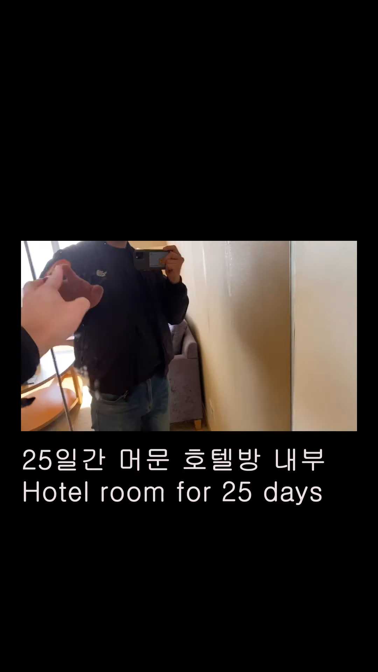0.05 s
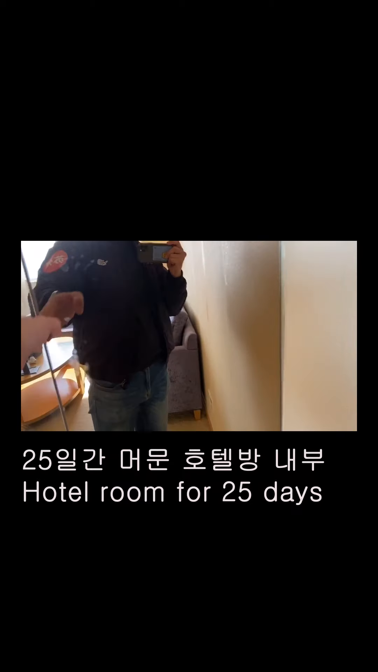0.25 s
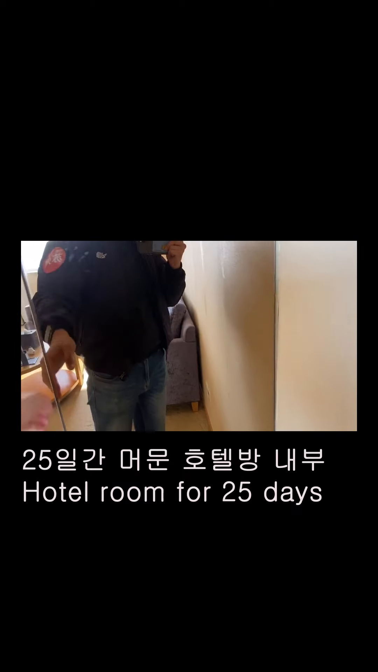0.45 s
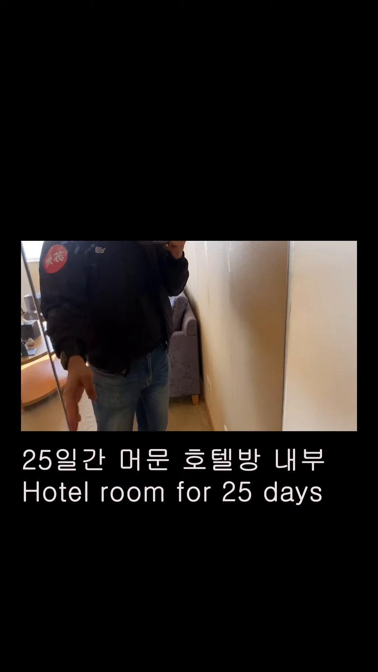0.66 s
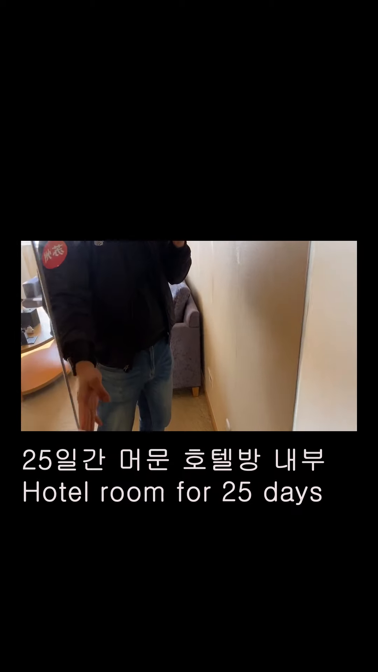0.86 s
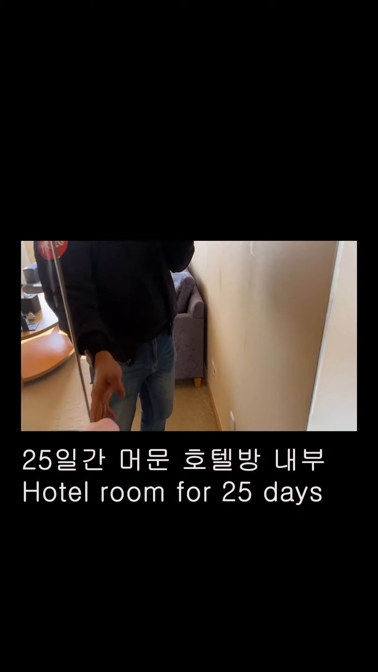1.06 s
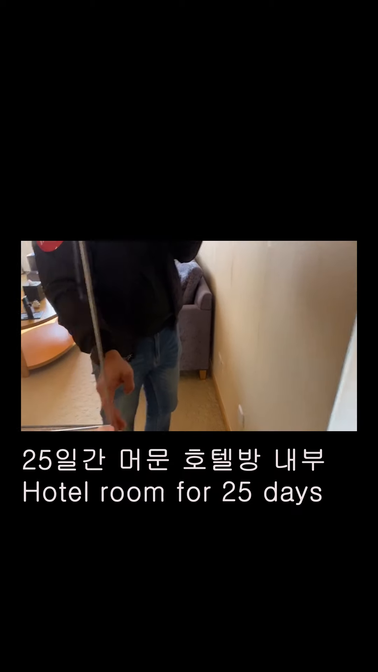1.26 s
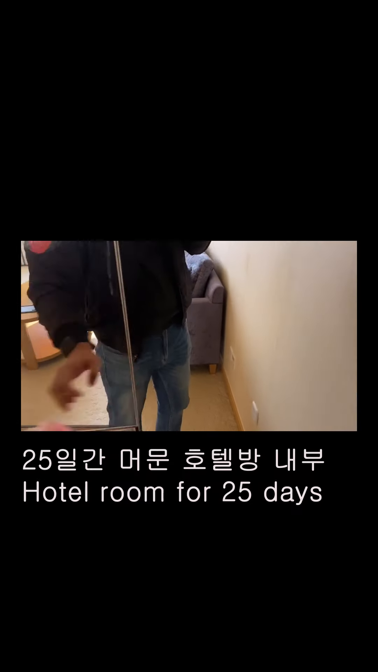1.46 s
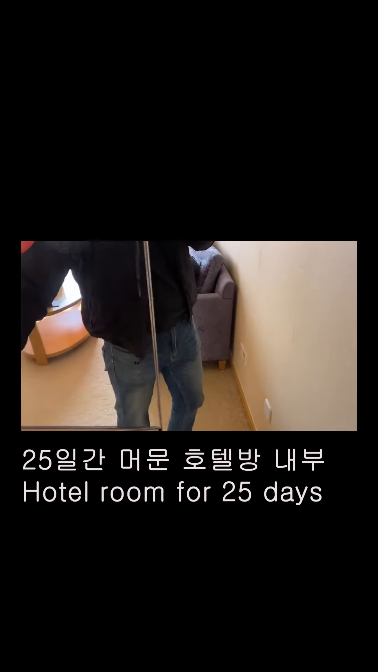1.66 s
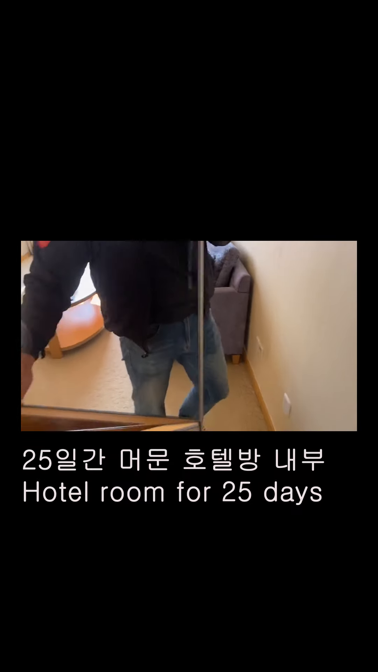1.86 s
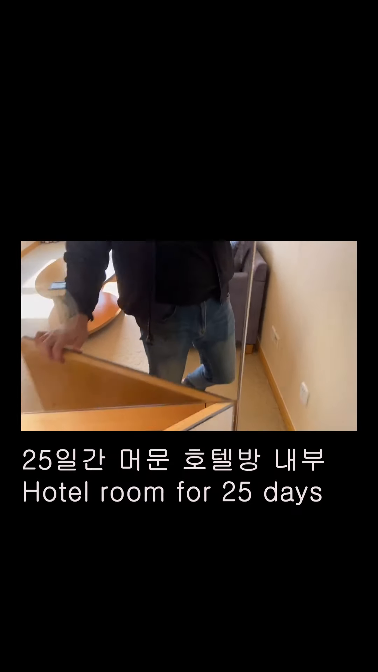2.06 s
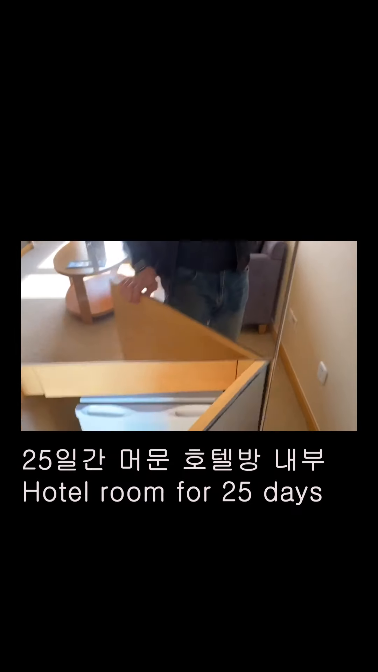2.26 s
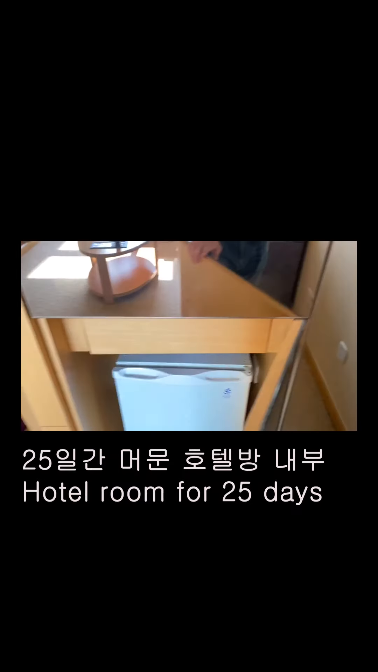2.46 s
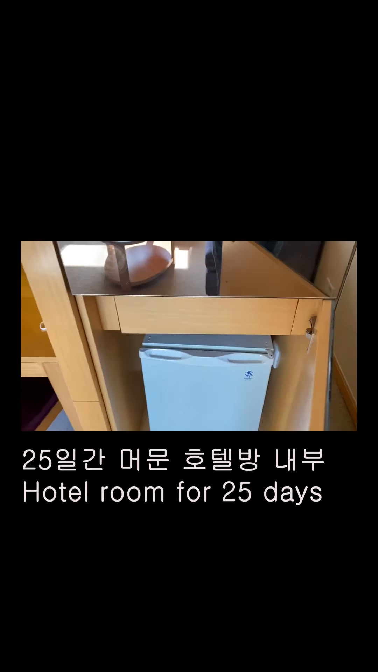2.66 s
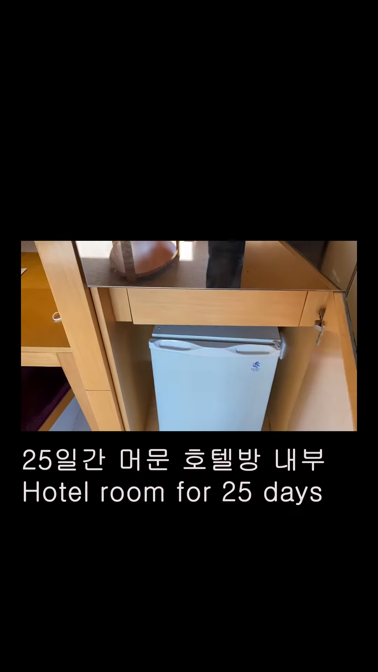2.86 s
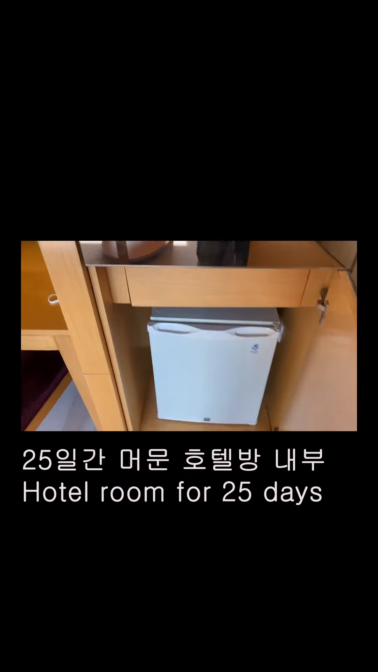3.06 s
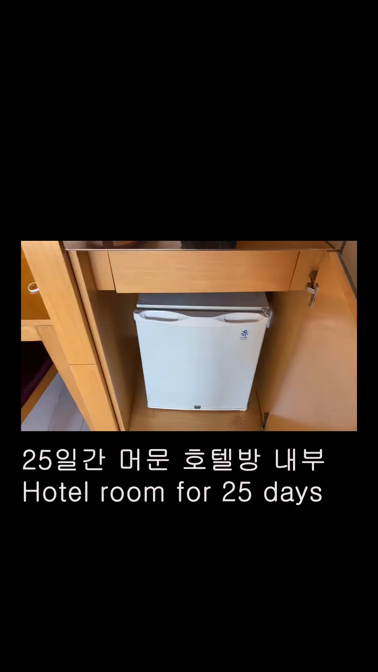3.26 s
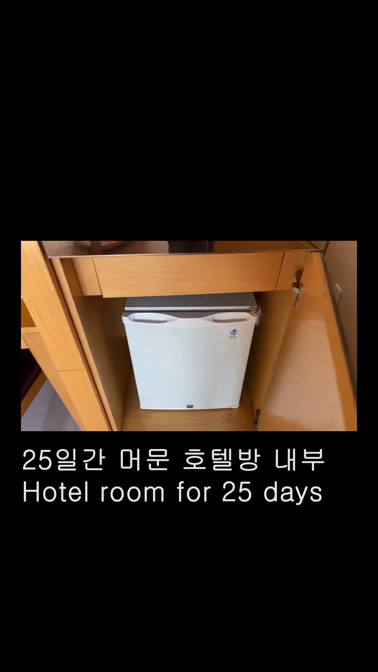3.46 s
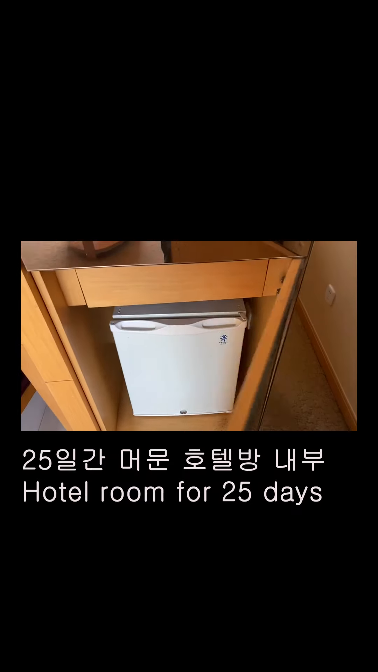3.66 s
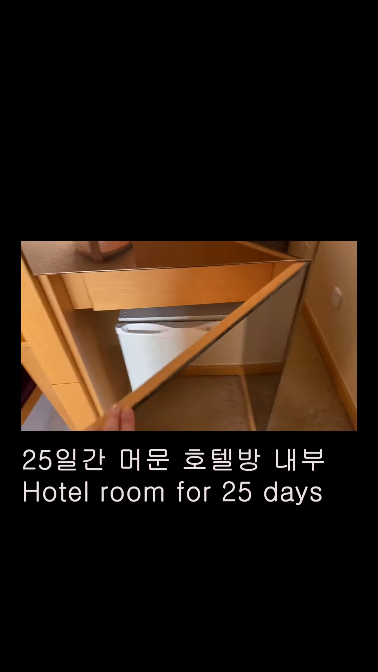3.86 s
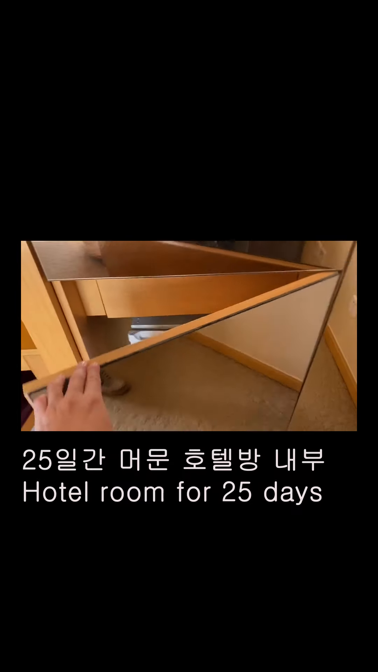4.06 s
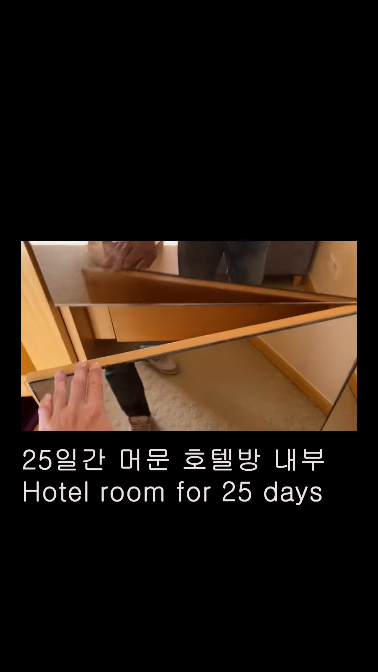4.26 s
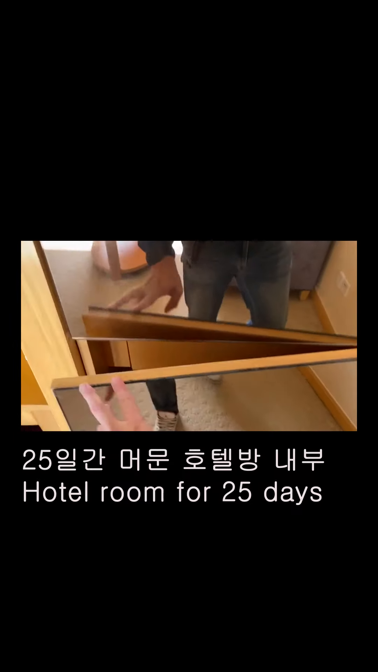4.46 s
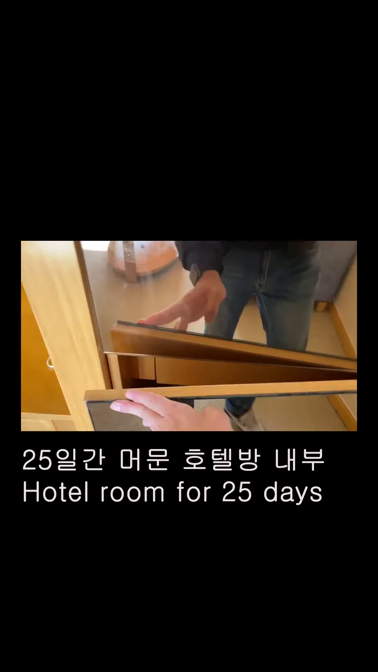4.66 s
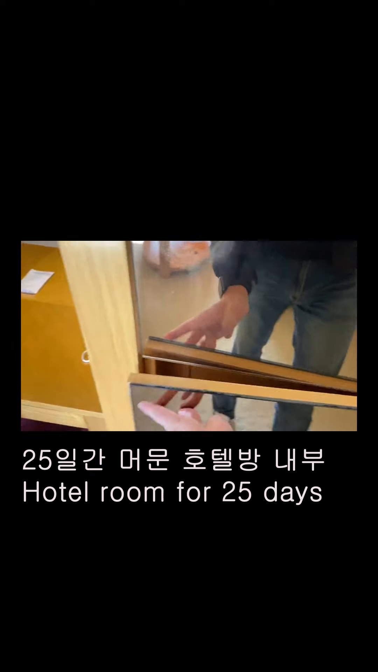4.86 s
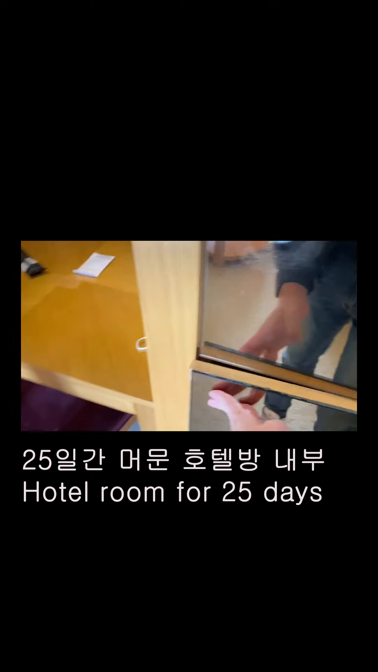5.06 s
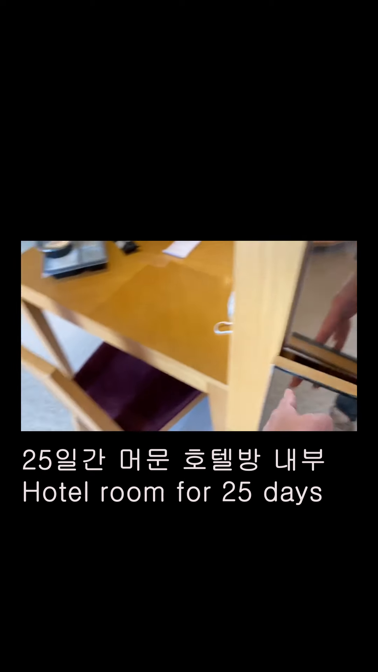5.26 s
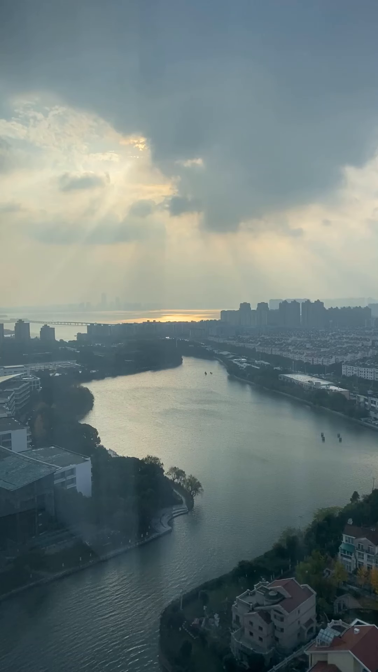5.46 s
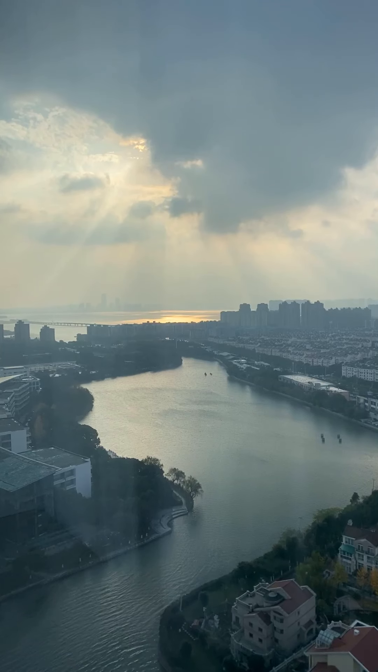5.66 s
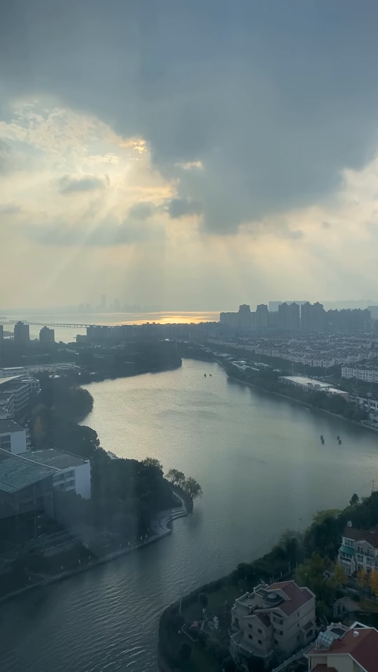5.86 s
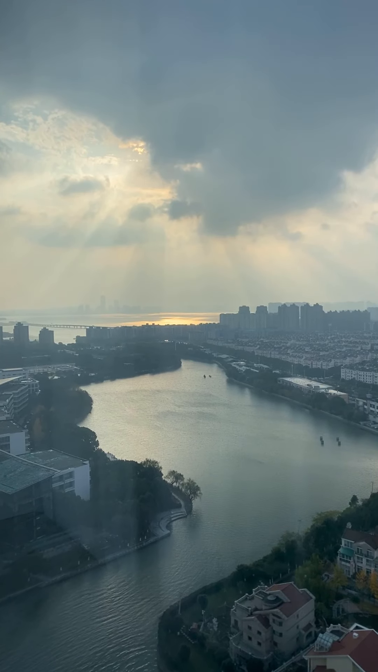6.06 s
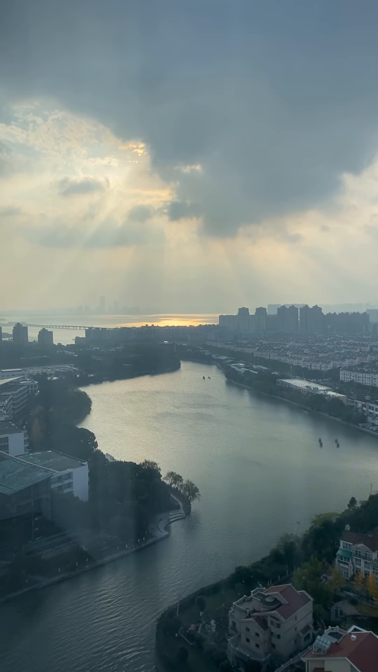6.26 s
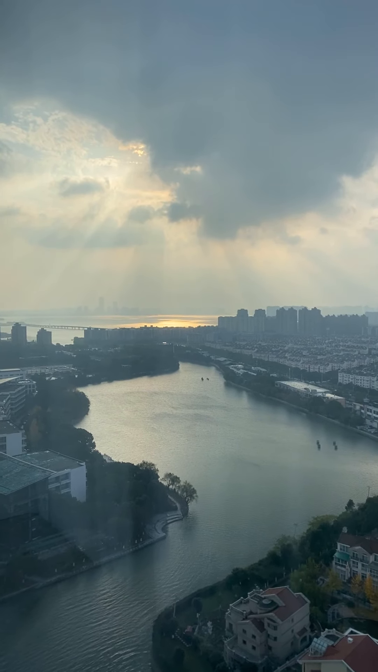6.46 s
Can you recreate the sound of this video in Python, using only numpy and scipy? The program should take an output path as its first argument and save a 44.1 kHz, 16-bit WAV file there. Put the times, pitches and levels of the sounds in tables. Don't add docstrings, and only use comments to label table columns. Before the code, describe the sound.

Close handheld sound of someone working wooden cabinet doors indoors: low carcass booms, fabric rubbing and small fingertip taps first, then a loud hollow double bang as the door opens. A softer rustling stretch follows, then a clack, creaky rubs and a cluster of solid closing knocks with short room echo. A crisp catch click ends it, cutting to a faint, steady distant rumble.

```python
import sys
import numpy as np
from scipy import signal
from scipy.fft import rfft, irfft, next_fast_len
from scipy.io import wavfile
from scipy.ndimage import uniform_filter1d

SR = 44100
rng = np.random.default_rng(int(sys.argv[2]) if len(sys.argv) > 2 else 0)


def volts(x):
    e = np.asarray(x, float) / 20
    return 10 ** e


def store_pcm(level_fs):
    pcm = np.round(np.clip(level_fs, -1, 1) * 32767).astype(np.int16)
    wavfile.write(sys.argv[1], SR, np.atleast_2d(pcm).T)


N = 287091
STEP_S = .002
CUT_S, RESUME_S = 5.41, 5.482


def evened(x):
    return x / np.sqrt(np.mean(x ** 2) + 1e-20)


def read(points, hz):
    f, value = np.transpose(points)
    return np.interp(np.log(hz + 1), np.log(f + 1), value)


def add(mix, s, sound):
    part = mix[round(s * SR):][:len(sound)]
    part += sound[:len(part)]


def spread_out(power):
    height = np.sqrt(abs(uniform_filter1d(power, size=7)))
    return np.interp(np.arange(N) / SR, np.arange(len(power)) * STEP_S, height)


def hiss(spectrum, patchy_db):
    hz = np.fft.rfftfreq(1024, 1 / SR)
    a, b, patches = rng.standard_normal((N // 256 + 5, 513, 3)).T
    patches = uniform_filter1d(patches, size=14, axis=0)
    patches = evened(uniform_filter1d(patches, size=8, axis=1))
    z = (a + 1j * b) * volts(read(spectrum, hz)[:, None] + patchy_db * patches)
    return evened(signal.istft(z, nperseg=1024, noverlap=768)[1][:N])


def wavering(hz, width_hz, steady):
    r = np.exp(-np.pi * width_hz / SR)
    push = rng.standard_normal(N) + 1j * rng.standard_normal(N)
    swing = signal.lfilter([1], [1, -r], signal.lfilter([1], [1, -r], push))
    power = abs(swing) ** 2
    swing = swing / (power + np.mean(power) / 12) ** (np.clip(steady, 0, 1) / 2)
    return evened((swing * np.exp(2j * np.pi * hz * np.arange(N) / SR)).real)


# peak in seconds, lower mode in dB, upper mode in dB, fade in dB per second.
THUMPS = [(.05, -42, -59, 190), (1.129, -42, -50.5, 300), (1.245, -37, -54, 110),
          (1.308, -29.5, -40.5, 270), (1.39, -52, -50.5, 41), (1.744, -41, -35, 258), (1.795, -38, -54, 89),
          (1.87, -51, -49, 160), (2.0, -35.5, -51.5, 280), (2.12, -43, -49, 314), (2.23, -51, -54, 210),
          (2.39, -30, -20, 117), (2.44, -36, -30, 70), (2.59, -49, -36.5, 320), (2.755, -52, -41, 380),
          (2.81, -73, -55, 24), (3.13, -58, -59, 36), (3.72, -50.5, -63, 350), (3.86, -54, -62, 310),
          (4.04, -42, -45, 105), (4.08, -40, -30, 280), (4.189, -54, -41, 410), (4.52, -38.5, -40, 270),
          (4.722, -38.5, -48, 130), (4.765, -37, -63, 162), (4.875, -31, -39.5, 180), (4.97, -33, -27, 112),
          (5.015, -36, -41, 53), (5.17, -44, -41, 386), (5.295, -43, -54, 283)]
# time in seconds, level in dB.
UNREST = [(0.0, -59), (1.0, -56.5), (1.6, -72), (3.45, -65), (3.68, -58.5), (3.8, -67), (3.97, -77),
          (4.25, -56), (4.66, -52.5), (5.41, -65)]


def boom():
    s, low_db, high_db, fade = np.transpose(THUMPS)[:, :, None]
    t = np.arange(0, N / SR, STEP_S)
    before, after = np.minimum(t - s, 0), np.maximum(t - s, 0)
    rise_db = (279.5 + 8.5 * np.maximum(low_db + 37, 0)) * before
    rest = volts(2 * np.interp(t, *np.transpose(UNREST)))
    low_power = rest + volts(2 * (low_db + rise_db - fade * after)).sum(0)
    high_power = rest * volts(-6) + volts(2 * (high_db + rise_db - 1.67 * fade * after)).sum(0)
    low = spread_out(low_power) * wavering(62, 12.13, steady=0.67)
    return low + spread_out(high_power) * wavering(100, 32, steady=1.0)


def strokes(rows, db_per_octave, octaves):
    s, half, db, bright = np.transpose(rows)[:, :, None]
    arch_db = -4.5 * ((np.arange(0, N / SR, STEP_S) - s) / half) ** 2
    return volts(2 * (db + arch_db - db_per_octave * abs(octaves - bright))).sum(0)


# pitch in Hz, level in dB per Hz.
CLOTH = [(71, -44), (120, 3.5), (228, -8.5), (288, -0.5), (337, -9), (478, -7), (793, -6.5), (1290, -10),
         (2920, -12.5), (4320, -9), (5560, -6), (6890, -11.5), (8540, -23.5), (10800, -17.5), (12600, -21),
         (16400, -50), (22000, -120)]
CLOTH_EDGES_HZ = [130, 500, 1250, 3100, 8000, 12600]
# brightness in octaves, resting level in dB.
RANGES = [(0.02, -69), (1.7, -80.5), (3.05, -72.5), (4.3, -77), (5.3, -77.5)]
# middle in seconds, half length in seconds, level in dB, brightness in octaves.
SWEEPS = [(.09, 0.15, -64.5, 3.15), (.66, 0.096, -68.5, 2.9), (1.32, 0.061, -65, 3.9),
          (1.46, 0.17, -70.5, 3.8), (1.74, 0.062, -62, 2.3), (1.97, 0.084, -64, 3.8),
          (2.16, 0.06, -58.5, 2.85), (2.43, 0.12, -53.5, 2.66), (2.74, 0.066, -62.5, 2.7),
          (2.89, 0.061, -61.5, 2.86), (3.12, 0.13, -64.5, 2.3), (3.41, 0.066, -57, 2.26),
          (3.53, 0.074, -56.5, 3.1), (3.885, 0.042, -54.5, 3.2), (4.0, 0.051, -60, 3.6),
          (4.22, 0.23, -72, 3.5), (4.51, 0.063, -61, 2.74), (4.68, 0.067, -61.5, 2.47),
          (4.85, 0.05, -62.5, 2.6), (5.24, 0.18, -61, 2.4), (5.37, 0.071, -61.5, 2)]
# middle in seconds, half length in seconds, level in dB, brightness in octaves.
SCRAPES = [(1.94, 0.09, -51.5, 3.22), (2.32, 0.11, -52.5, 2.5), (2.42, 0.1, -54.5, 5.3),
           (3.64, .05, -67.5, 5.3), (3.66, 0.065, -62.5, 1.7), (3.78, 0.07, -56, 3.5),
           (3.88, 0.038, -55, 5.3), (4.06, .05, -57.5, 1.7), (4.16, .07, -55, 2.65),
           (4.34, 0.081, -50.5, 2.59), (4.99, 0.041, -48, 2.2), (5.31, 0.11, -59, 5.3),
           (1.92, 0.16, -57.5, .1), (2.45, 0.23, -56.5, 0.078), (3.45, 0.25, -63.5, .1),
           (4.15, 0.27, -60, .1), (4.6, 0.16, -64, .1), (5.03, 0.036, -43, .1), (5.17, 0.085, -51.5, .1)]


def rustle():
    grain = volts(0.81 * evened(uniform_filter1d(rng.standard_normal(N), size=120)))
    size = next_fast_len(N)
    spectrum = rfft(hiss(CLOTH, patchy_db=2.5) * grain, size)
    hz = np.fft.rfftfreq(size, 1 / SR)
    above = [1 / (1 + (edge / (hz + 1)) ** 12) for edge in CLOTH_EDGES_HZ]
    out = np.zeros(N)
    for lo, hi, (octaves, rest_db) in zip(above, above[1:], RANGES):
        moved = strokes(SWEEPS, 3.5, octaves) + strokes(SCRAPES, 13.5, octaves)
        band = evened(irfft(spectrum * np.sqrt(abs(lo - hi)), size)[:N])
        out += spread_out(volts(2 * rest_db) + moved) * band
    return out


# start in seconds, weight in dB, edge in dB, contact in ms, edge pitch in Hz.
TICKS = [(1.215, -44, -53.5, 4.4, 2600), (2.129, -77, -62, 2.8, 3000), (2.705, -59, -57.5, 11.5, 1800),
         (3.642, -65.5, -62, 4.2, 1800), (4.31, -60, -56, 2.7, 1990), (5.1477, -55, -49, 3.5, 2570)]
TOUCHES = [(1.262, -54, -59, 4, 2700), (1.309, -60.5, -69, 4.8, 1300), (1.6865, -57, -51, 2.8, 2000),
           (1.739, -60, -64, 3.7, 1500), (1.76, -65, -66, 3.6, 1500), (1.998, -56, -54.5, 13, 2100),
           (2.879, -72, -65, 8.3, 1800), (4.487, -60, -58.5, 5.9, 2020)]
JOLTS = [(2.39, -36, -50, 2.5, 2200), (1.659, -53.5, -74, 2.5, 1500), (2.409, -47, -49, 5.6, 2430),
         (3.9982, -35, -39, 0.93, 2900), (4.0044, -37.5, -49, 2.2, 1410), (4.04, -44, -55, 4.7, 3400),
         (4.444, -49.5, -69, 5.5, 2000), (4.519, -58, -65, 2.9, 2000), (4.685, -53.5, -59, 5.4, 2100),
         (4.865, -42, -56, 11.5, 1900), (5.065, -45, -70, 8.4, 1800)]
LANDINGS = [(1.932, -41.5, -50.5, 4.7, 1980), (1.946, -38.5, -46, 3, 2150), (2.334, -31, -41, 2.1, 2470),
            (2.364, -31, -43, 4.4, 2400), (4.954, -26.5, -41, 1.4, 2200)]
SHUTS = [(4.84, -35, -46, 4.7, 2000), (4.935, -36, -40, 2.2, 2400), (4.974, -40.5, -62, 4.1, 2000),
         (5.02, -45, -71, 8.2, 1800), (5.119, -57, -79, 5.6, 1800)]


def blows():
    kinds = [(LANDINGS, 0.1, -0.98, -9.5), (SHUTS, 0.054, .3, -24), (JOLTS, 0.1, -8.5, -11),
             (TOUCHES, 0.12, 2.1, -13), (TICKS, 0.68, -3.2, -3.9)]
    rows = []
    for table, share, middle_db, snap_db in kinds:
        for s, weight, edge, ms, hz in table:
            middle = weight + share * (edge - weight) + middle_db
            rows.append((s, edge + snap_db, weight, middle, edge, ms, hz))
    return sorted(rows)


def ring(modes, seconds):
    t = np.arange(round(seconds * SR)) / SR
    hz, db, t60 = np.transpose(modes)[:, :, None]
    return volts(db - 60 * t / t60) * np.sin(2 * np.pi * hz * t)


CROWD, FORCE = 40, 1536


def crowd(lo_hz, hi_hz, tilt_db, t60):
    hz = np.geomspace(lo_hz, hi_hz, CROWD)
    return np.transpose([hz, tilt_db * np.log2(hz / lo_hz), t60 * (lo_hz / hz) ** 0.35])


def lift(modes, hz, db, octaves):
    return volts(db * np.exp(-(np.log2(modes[:, 0] / hz) / octaves) ** 2))


def contact_force(contact_ms, ragged):
    t = np.arange(FORCE) / SR
    u = 1000 * t / max(contact_ms, .3)
    shape = np.sqrt((1 - np.exp(-u / 0.36)) * np.exp(-u))
    shove = 3.27 * np.exp(-t / 0.00048)
    slips = rfft(ragged * shape)
    evening = (np.sqrt(np.mean(abs(slips) ** 2)) / abs(slips)) ** 0.67
    return shape * (shove * shape + irfft(slips * evening, FORCE))


# pitch in Hz, level in dB, time to die by 60 dB in seconds.
PANEL = [(149.3, -6, 0.17), (164.7, -5, 0.39), (192.4, 0, 0.18), (225.9, -2.5, 0.4), (264, -2.5, 0.14),
         (303.3, -8, 0.24), (373.4, 2, 0.081)]
# pitch in Hz, level in dB, time to die by 60 dB in seconds.
KNOCK = [(411.7, -9, 0.16), (432, -1, 0.06), (474, -8.5, 0.13), (534.7, -9.5, 0.14), (579.5, -1.5, 0.063),
         (668, -6, 0.064), (758, -1, 0.069), (847, -3, 0.067), (999, -13, 0.087), (1067, 4.5, 0.012)]
# lowest pitch in Hz, highest pitch in Hz, tilt in dB per octave, time to die by 60 dB in seconds.
CRACK = [(1130, 3600, -3, 0.07)]
SNAP = [(3970, 11500, -8.5, 0.032)]
# pitch in Hz, lift in dB.
HARDWARE = [(4750, 4.5), (6600, 7)]


def knocks():
    out = np.zeros(N)
    snap, crack, knock = crowd(*SNAP[0]), crowd(*CRACK[0]), np.array(KNOCK)
    panel_fade = np.cos(np.linspace(0, np.pi / 2, SR // 2))
    bodies = ring(snap, .03), ring(PANEL, .5) * panel_fade, ring(knock, .15), ring(crack, .07)
    lags_s = 0, 0.00304, 0, 0
    hardware = np.prod([lift(snap, hz, db, 0.13) for hz, db in HARDWARE], axis=0)
    contacts = blows()
    chance = rng.standard_normal((len(contacts), FORCE + 2 * CROWD))
    for (s, *levels_db, contact_ms, edge_hz), draw in zip(contacts, chance):
        sign, spread, ragged = np.split(draw, [CROWD, 2 * CROWD])
        force = contact_force(contact_ms, ragged)
        shares = np.sign(sign) * volts(3.3 * spread)
        lifts = hardware, 1, lift(knock, edge_hz / 2, 2.5, 0.18), lift(crack, edge_hz, 8.5, 0.18)
        for body, db, lifted, lag_s in zip(bodies, levels_db, lifts, lags_s):
            sound = signal.fftconvolve(force, lifted * shares[:len(body)] @ body)
            add(out, s + lag_s, volts(db) * sound / np.sqrt(np.mean(sound[:900] ** 2)))
    return out


# start in seconds, pitch in Hz, level in dB,
# time to die by 60 dB in seconds.
BLOW_RINGS = [(1.2165, 1900, -46, .03), (1.217, 3800, -51, .02), (1.945, 800, -44, .12),
              (1.945, 3800, -55, .08), (1.217, 6300, -52, .012), (1.264, 2500, -48, .03),
              (1.264, 3900, -51, .02), (1.263, 4700, -55, .02), (1.6865, 1250, -37, .05),
              (1.6865, 1680, -38, .05), (1.6865, 2080, -37, .05), (1.691, 727, -38, .12),
              (1.692, 2600, -40, .03), (1.693, 950, -43, .04), (1.688, 4300, -50, .02),
              (1.688, 5700, -48, .015), (1.688, 8000, -51, .012), (1.703, 170, -40, .1),
              (1.755, 500, -50, .1), (1.773, 2700, -56, .06), (2.328, 270, -27, .06),
              (2.335, 400, -16, .07), (2.339, 190, -17, .13), (2.334, 560, -23, .06),
              (2.334, 850, -27, .06), (2.336, 1157, -29, .08), (2.336, 1400, -29, .06),
              (2.341, 1600, -33, .06), (2.334, 2230, -40, .05), (2.333, 2680, -33, .04),
              (2.333, 4700, -32, .03), (2.362, 270, -22, .1), (2.365, 365, -13, .08),
              (2.368, 560, -28, .07), (2.365, 830, -28, .08), (2.367, 1140, -25, .09),
              (2.366, 1450, -28, .05), (2.363, 2100, -36, .03), (2.364, 2500, -35, .05),
              (2.364, 2700, -37, .04), (2.363, 3800, -38, .04), (2.364, 4680, -39, .07),
              (2.363, 6900, -38, .03), (2.368, 165, -14, .16), (2.408, 400, -33, .15),
              (2.408, 780, -39, .15), (2.39, 62, -20, .6),
              (3.9975, 2540, -28, .05), (3.999, 2363, -33, .06), (4.002, 2175, -34, .05),
              (4.004, 1394, -29, .035), (4.001, 441, -25, .04), (4.002, 361, -31, .08),
              (4.003, 178, -28, .1), (3.9985, 3700, -34, .035), (3.998, 2950, -35, .04),
              (4.003, 1100, -31, .09), (3.9985, 4900, -35, .025), (3.998, 105, -25, .25),
              (4.01, 560, -34, .08), (4.02, 800, -38, .2), (4.043, 175, -27, .4), (4.05, 1250, -43, .05),
              (4.05, 2000, -44, .2), (4.022, 62, -18, .24), (4.84, 490, -21, .06), (4.841, 720, -25, .1),
              (4.84, 1050, -31, .1), (4.846, 255, -23, .27), (4.84, 170, -19, .12), (4.845, 105, -30, .3),
              (4.85, 1550, -42, .05), (4.852, 2250, -44, .04), (4.852, 3900, -53, .06),
              (4.935, 880, -18, .045), (4.935, 1060, -19, .04), (4.934, 1880, -26, .05),
              (4.941, 2180, -33, .05), (4.94, 1500, -29, .05), (4.939, 420, -21, .1),
              (4.935, 560, -23, .06), (4.95, 545, -18, .07), (4.938, 185, -16, .09), (4.937, 270, -24, .05),
              (4.943, 750, -25, .08), (4.95, 1100, -32, .05), (4.958, 2200, -37, .06),
              (4.964, 240, -19, .2), (4.937, 7500, -46, .03), (4.938, 5300, -47, .03),
              (4.937, 10500, -50, .02), (5.149, 2570, -38, .04), (5.15, 2100, -41, .04),
              (5.15, 800, -44, .04), (5.149, 1500, -48, .03), (5.149, 3700, -45, .02)]
# pitch as a ratio, level in dB.
NEIGHBOURS = [(1, -3), (.955, -9), (1.037, -9)]


def rings():
    out, t = np.zeros(N), np.arange(SR // 2) / SR
    for s, hz, db, t60 in BLOW_RINGS:
        cluster = ring([(hz * ratio, db + near_db, t60) for ratio, near_db in NEIGHBOURS], .5).sum(0)
        add(out, s, (1 - np.exp(-t * hz / 1.2)) * cluster)
    return out


# pitch in Hz, time to die by 60 dB in seconds.
ROOM = [(100, 0.73), (400, 0.32), (1100, 0.25), (3000, 0.36), (8000, 0.54)]


def room(x):
    taps = np.zeros(SR // 2)
    at = np.arange(200, SR // 2 - 20, 20)
    taps[at + rng.integers(0, 20, len(at))] = rng.choice([-1., 1.], len(at))
    hz, t, z = signal.stft(taps, SR, nperseg=256)
    tail = signal.istft(z * volts(-60 * t / read(ROOM, hz)[:, None]), SR, nperseg=256)[1]
    return signal.fftconvolve(x, tail / np.linalg.norm(tail))[:N]


# middle in seconds, half length in seconds, level in dB, pitch in Hz, width in Hz.
SQUEAKS = [(1.885, .04, -57, 2050, 350), (1.87, .025, -63, 3400, 300), (2.015, .035, -56, 2080, 200),
           (2.314, .012, -50, 2450, 350), (4.12, .03, -62, 1220, 120), (4.34, .05, -60, 1400, 300),
           (5.17, .02, -58, 2400, 250), (4.313, .004, -54, 5950, 500), (5.152, .004, -45, 2570, 300),
           (5.149, .003, -50, 6600, 1200), (1.219, .004, -57, 4900, 900)]


def squeaks():
    out, t = np.zeros(N), np.arange(-6000, 6000) / SR
    noises = rng.standard_normal((len(SQUEAKS), len(t)))
    for (s, half, db, hz, width), noise in zip(SQUEAKS, noises):
        arch = volts(-6 * (t / half) ** 2)
        rub = arch * signal.lfilter(*signal.iirpeak(hz, hz / width, SR), noise)
        add(out, s + t[0], volts(db) * rub * np.linalg.norm(arch) / np.linalg.norm(rub))
    return out


# landing in seconds, swell in ms, level in dB, middle pitch in Hz.
DRAGS = [(2.312, 9.3, -45, 2180), (2.327, 5, -42, 2750), (2.334, 18.4, -38, 450), (3.999, 5, -38, 2620),
         (4.937, 9, -40, 1900), (5.147, 3.8, -46, 2190), (5.289, 3.2, -38.5, 1030)]


def drags():
    out, t = np.zeros(N), np.arange(-2600, 400) / SR
    noises = rng.standard_normal((len(DRAGS), len(t)))
    for (s, swell_ms, db, hz), noise in zip(DRAGS, noises):
        rub = evened(signal.lfilter(*signal.iirpeak(hz, 1.2, SR), noise))
        swell = np.exp(np.minimum(1000 * t / swell_ms, -t / 0.0018))
        add(out, s + t[0], volts(db) * rub * swell)
    return out


# pitch in Hz, level in dB, time to die by 60 dB in seconds.
CATCH_MODES = [(614, -2, 0.026), (1270, -3.5, 0.017), (1570, -3, 0.0062), (2880, -1, 0.0021),
               (4600, -4.5, 0.0021), (5360, -13, 0.0041), (6900, -22, 0.0045)]


def catch():
    out = np.zeros(N)
    signs = np.cos(np.pi * np.arange(len(CATCH_MODES)))
    sound = signs @ ring(CATCH_MODES, .06)
    add(out, 5.2907, volts(-19.5) * sound / abs(sound).max())
    return out


# pitch in Hz, level in dB per Hz.
QUIET = [(15, -67), (25, -36), (55, 2), (97, -16.5), (113, -6.5), (176, -9.5), (438, -18), (512, -21.5),
         (554, -21.5), (840, -22.5), (1450, -32.5), (1880, -31.5), (2930, -42), (11400, -47),
         (12600, -41.5), (16400, -66), (22000, -120)]


def quiet_room():
    return volts(-59) * hiss(QUIET, patchy_db=.3)


def scene():
    t = np.arange(N) / SR
    wood, snap = knocks() + drags() + rings(), catch()
    echoes = room(volts(-6.5) * wood + volts(-23) * snap)
    first = wood + snap + echoes + boom() + rustle() + squeaks()
    fade_out = np.clip((CUT_S - t) / .004, volts(-24) * (t < CUT_S + .018), 1)
    fade_in = np.clip((t - RESUME_S) / .002, 0, 1)
    return (first * fade_out + quiet_room() * (fade_in + volts(-43)))[None]


# pitch in Hz, width in Hz, level in dB.
NOTCHES = [(1030, 360, -0.5), (5575, 350, -5), (8000, 640, 1)]


def tone_db(hz):
    return sum(db * np.exp(-((hz - f) / width) ** 2) for f, width, db in NOTCHES)


def band_limit(x):
    return signal.sosfilt(signal.butter(12, 12850, fs=SR, output="sos"), x)


def record(dry):
    bass_cut = signal.butter(2, 44, "high", fs=SR, output="sos")
    hz, t, z = signal.stft(signal.sosfilt(bass_cut, dry), SR, nperseg=512)
    first_room = t < CUT_S
    z = z * volts(tone_db(hz)[:, None] * first_room) * (hz < 12550)[:, None]
    patch = uniform_filter1d(abs(z) ** 2, size=3, axis=1)
    patch = uniform_filter1d(patch, size=5, axis=2)
    weak = patch < volts(-8) * uniform_filter1d(patch, size=17, axis=1)
    z = z * volts(-14 * weak * (hz > 4300)[:, None] * first_room)
    mix = signal.istft(z, SR, nperseg=512)[1][:, :N]
    return band_limit(mix)


dry = scene()
out = record(dry)
store_pcm(out)
```